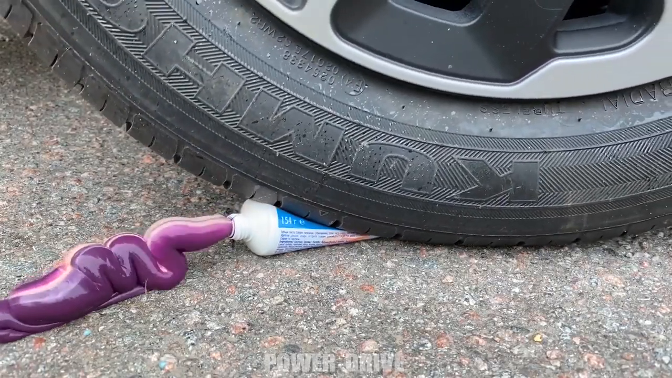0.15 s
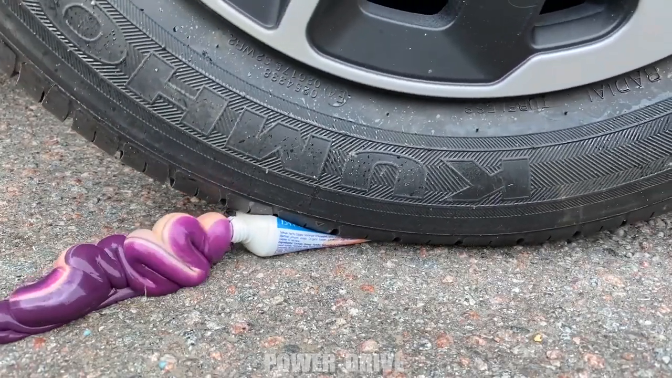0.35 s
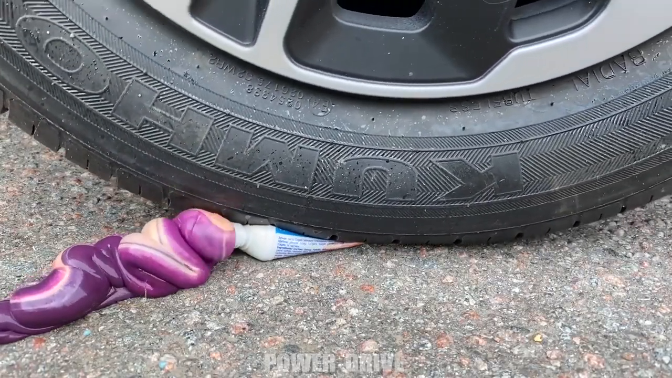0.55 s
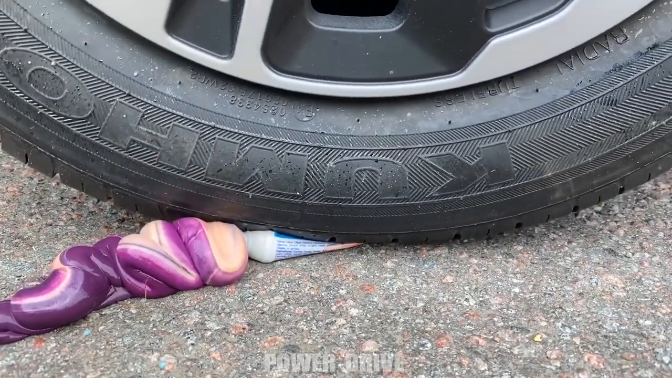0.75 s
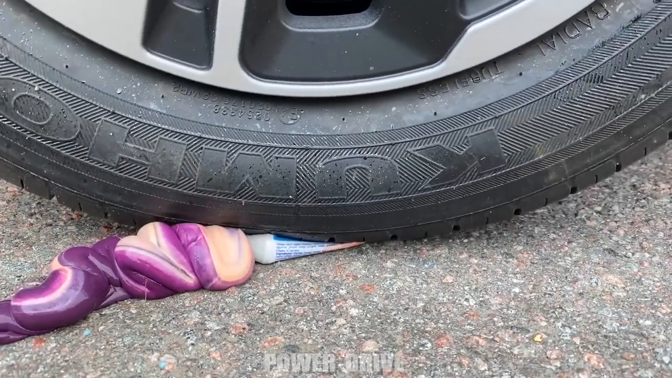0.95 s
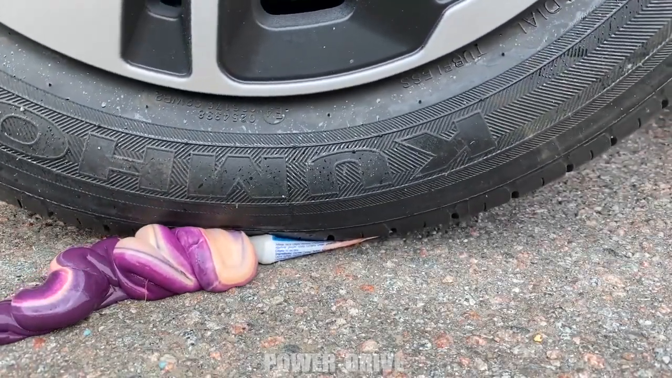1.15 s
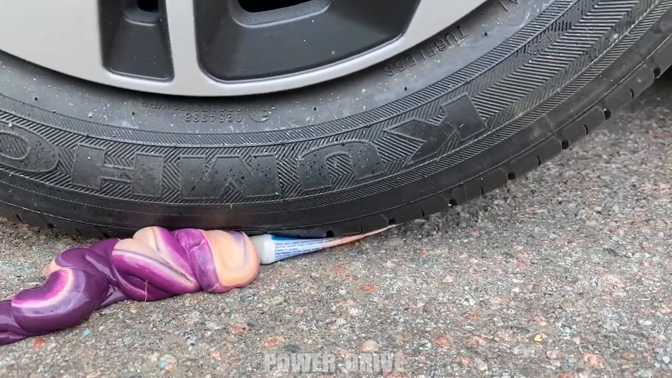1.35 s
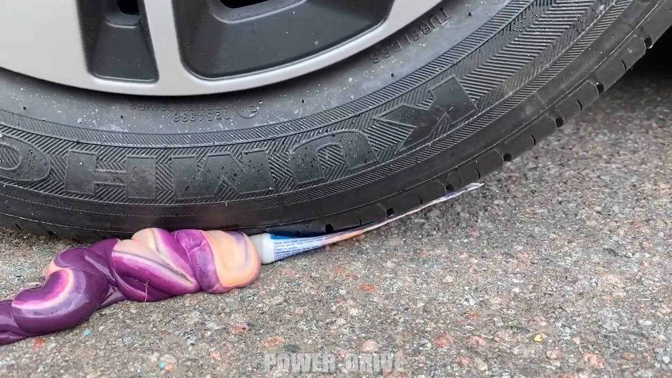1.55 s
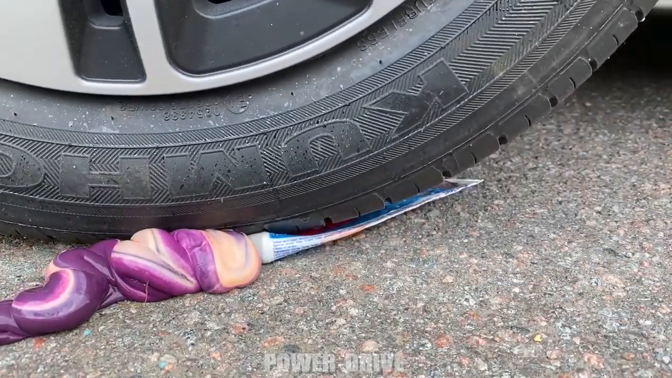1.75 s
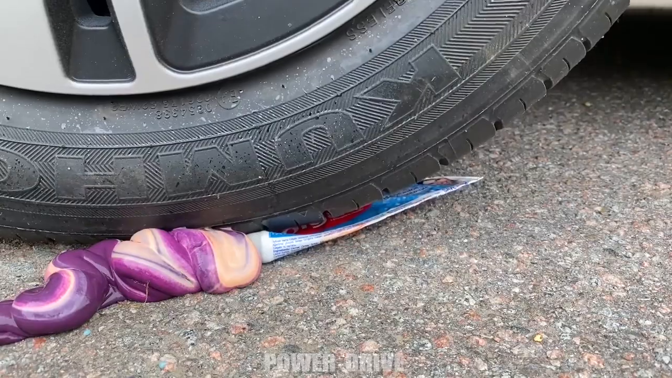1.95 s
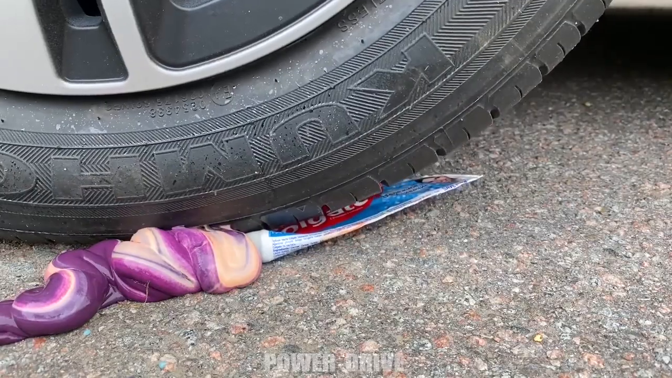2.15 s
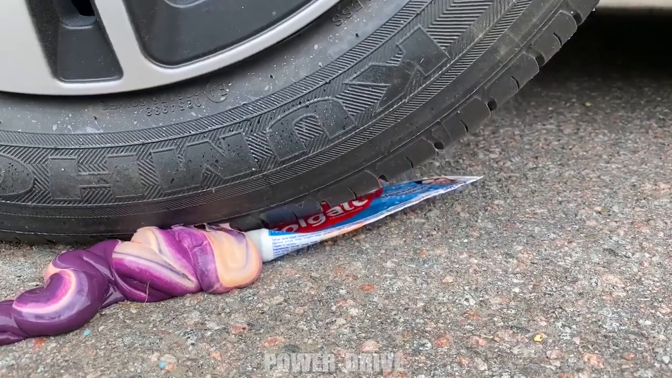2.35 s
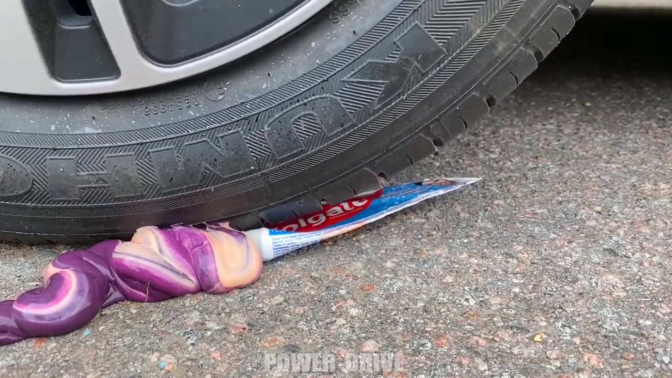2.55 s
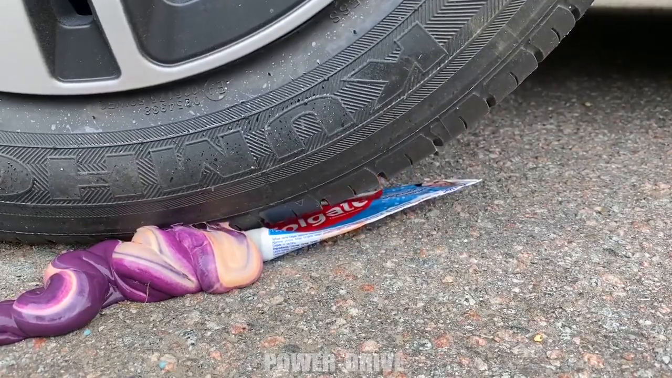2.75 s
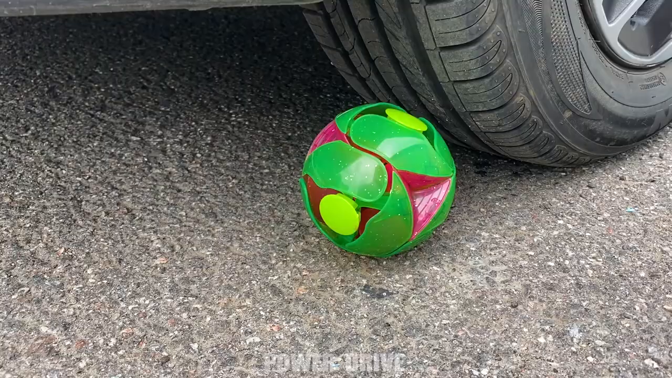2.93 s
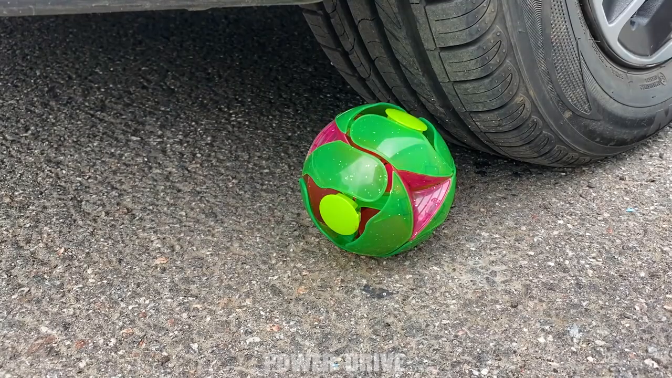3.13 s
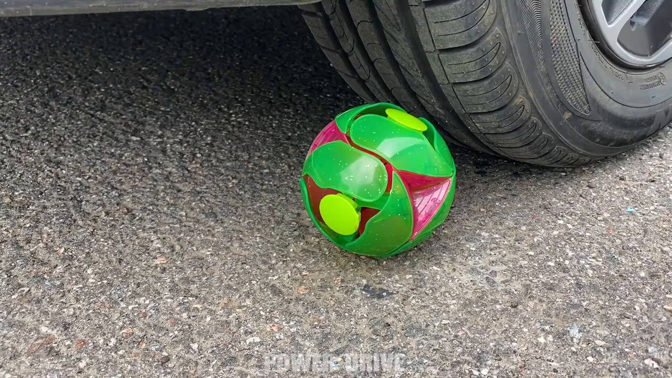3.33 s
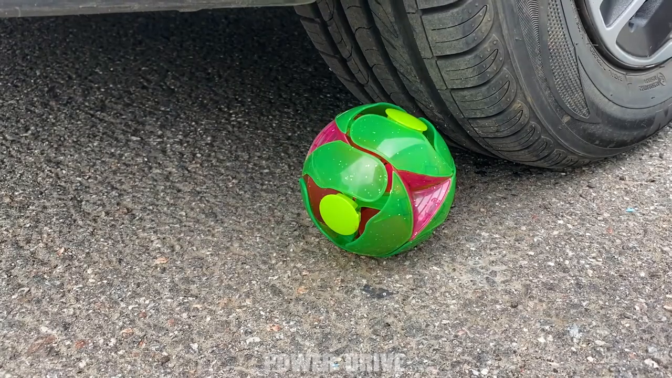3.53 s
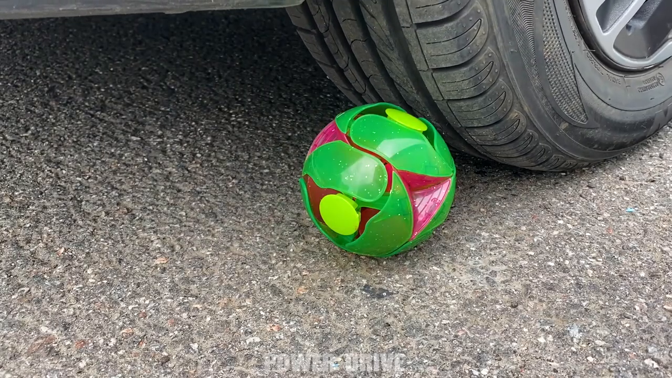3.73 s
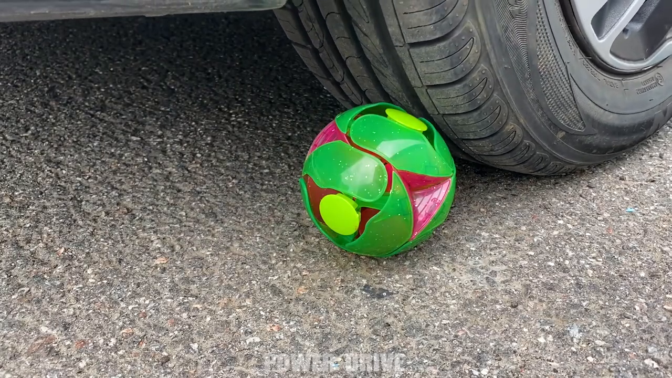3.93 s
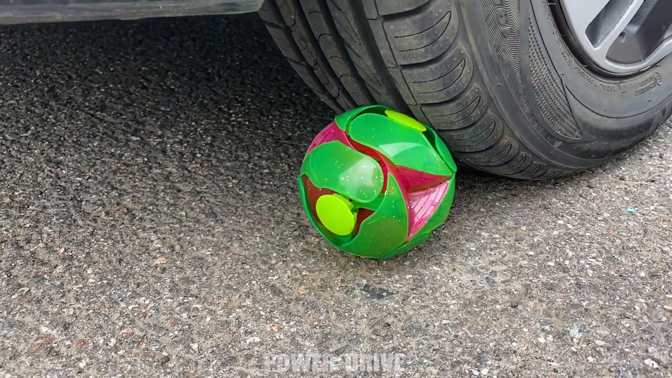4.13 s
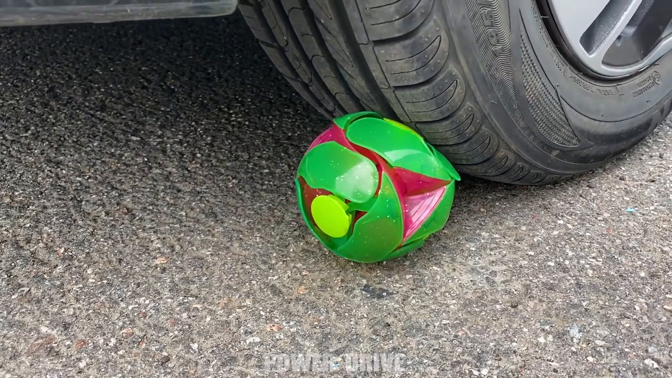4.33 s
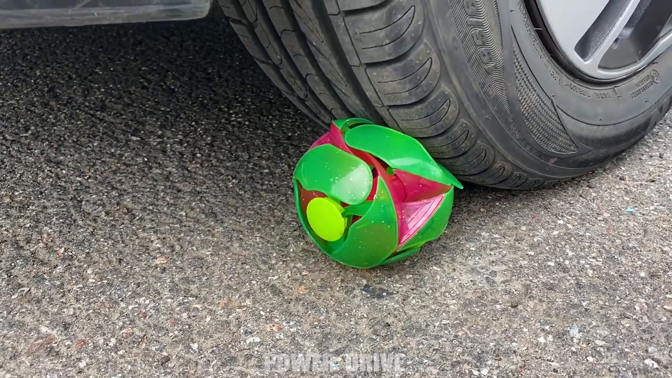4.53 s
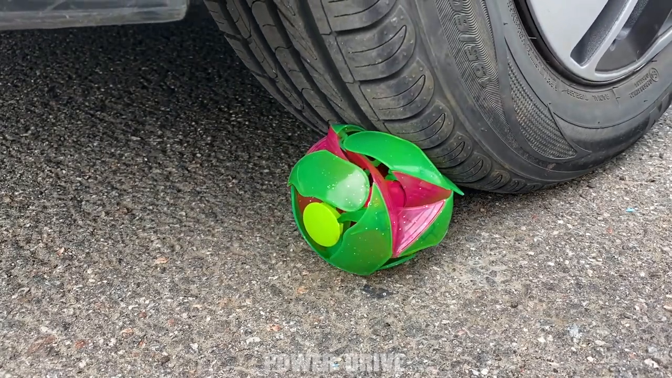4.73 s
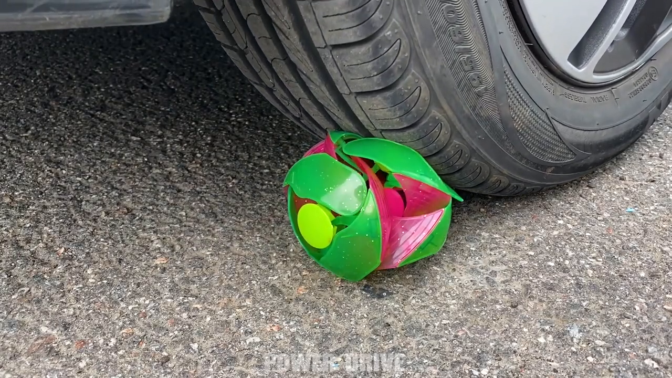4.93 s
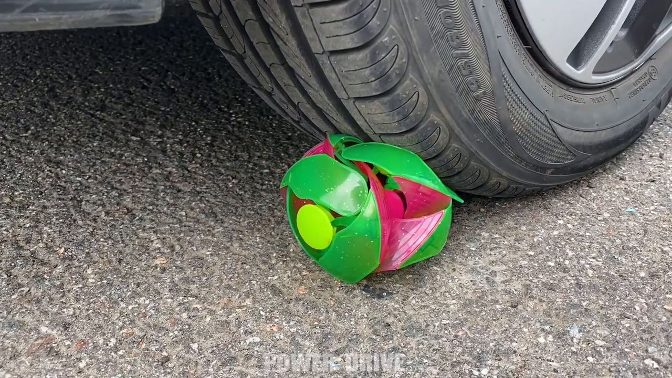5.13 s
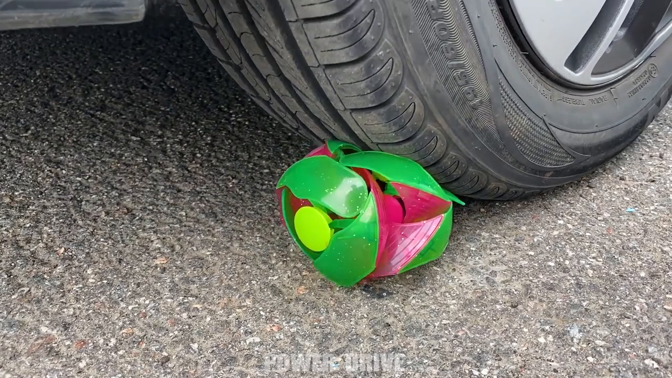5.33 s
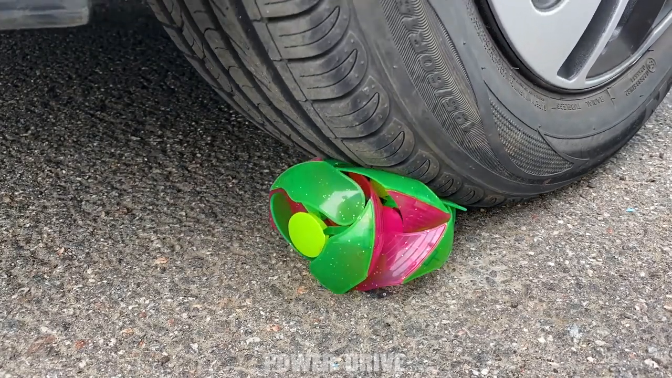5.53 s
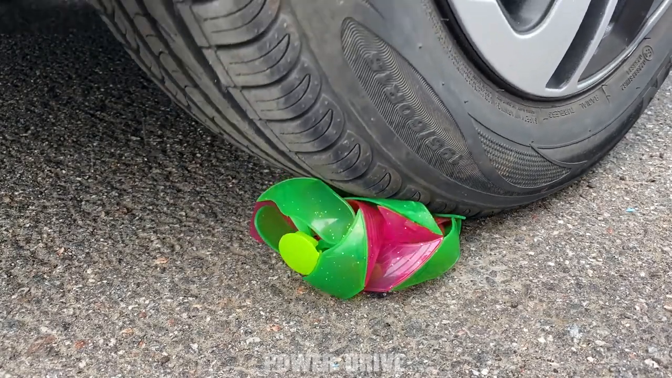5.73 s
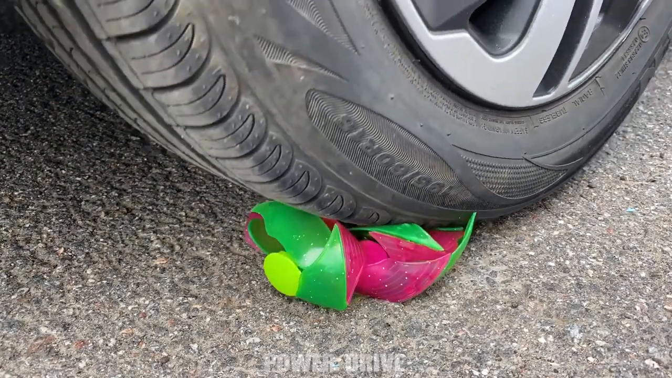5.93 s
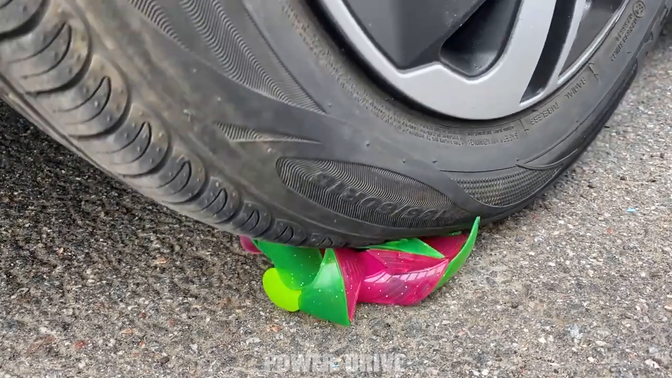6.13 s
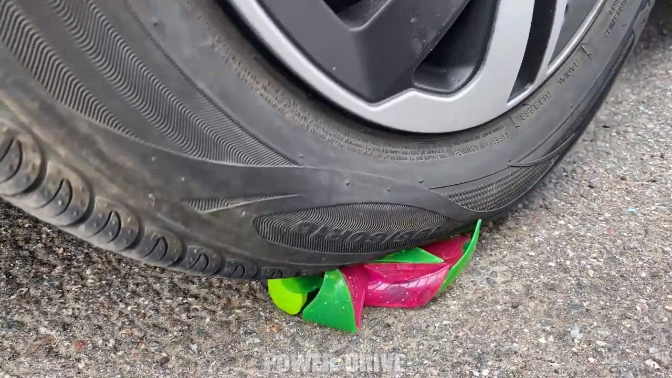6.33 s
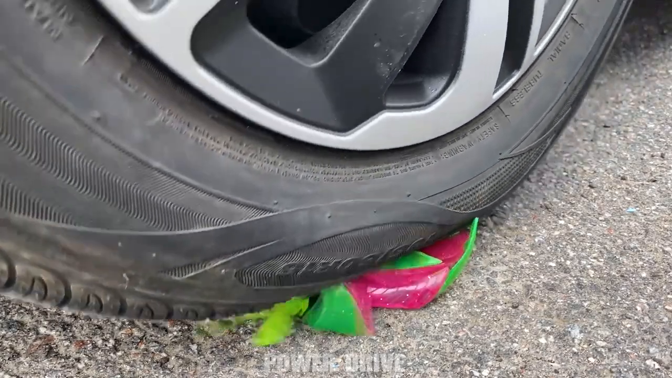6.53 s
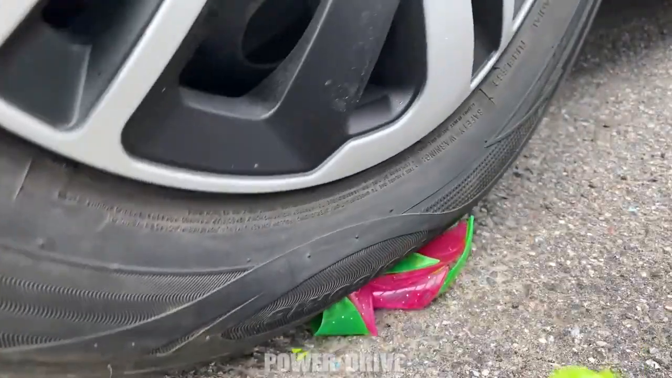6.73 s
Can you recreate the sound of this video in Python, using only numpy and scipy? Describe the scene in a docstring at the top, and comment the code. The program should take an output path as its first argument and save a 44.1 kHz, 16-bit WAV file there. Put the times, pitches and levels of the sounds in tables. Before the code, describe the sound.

Over a low engine hum, a soft tube faintly ticks and squeaks under a tyre, then a plastic toy ball cracks and crunches apart.

```python
"""A car idles close by, exhaust booming over a wash of engine noise, heard through a two-port microphone.
Faint ticks scatter. The tyre squeezes a soft tube, which whines, ticks and squeaks, then drops off it.
From 3 s, at a second spot: rumble, a faint chirp, a stone under the tread. The tyre creeps onto a hollow
plastic ball; the shell tears, snaps and rings, panels buckle and shove air out, splinters fall.
The engine wash dips and swells among the cracks and sinks away."""
import sys
import numpy as np
from scipy import signal
from scipy.fft import rfft, irfft
from scipy.io import wavfile
from scipy.ndimage import uniform_filter1d

SR = 44100
rng = np.random.default_rng(int(sys.argv[2]) if len(sys.argv) > 2 else 0)


def materialize(psi):
    """Save the field psi as 16-bit PCM at rate SR to the path in sys.argv[1].

    A 1-D psi becomes a single channel; in a 2-D psi each row is a channel.
    """
    bounded = np.clip(np.atleast_2d(psi).T, -1, 1)
    quanta = np.round(bounded * 32767).astype(np.int16)
    wavfile.write(sys.argv[1], SR, quanta)


N = 298896
SECOND_SPOT_S = 2.988
PAD = 64  # samples ahead of each tick and crack
SIDES = np.array([[1], [-1]])  # left, right


def gain_of(db):
    """Decibels to gain."""
    return 10 ** (np.asarray(db) / 20)


def unit_rms(x):
    """Scale to rms 1."""
    return x / np.sqrt(np.mean(x ** 2) + 1e-20)


def drift(count, size):
    """Unit-rms noise smoothed over size points."""
    return unit_rms(uniform_filter1d(rng.standard_normal(count), size=size))


def at_hz(points, hz):
    """Interpolate on a log-frequency axis."""
    f, value = np.transpose(points)
    return np.interp(np.log(hz + 1), np.log(f + 1), value)


def add(mix, s, sound):
    """Mix a stereo sound in at s seconds."""
    part = mix[:, round(s * SR):][:, :sound.shape[1]]
    part += sound[:, :part.shape[1]]


def ports(hz, lag_ms):
    """Left port's lag behind the right; treble creeps round the case with one lag for all sources."""
    lag_ms = np.interp(hz, (5000, 8000), [lag_ms, .186])
    return np.exp(-1j * np.pi * hz * lag_ms / 1000 * SIDES)


def wash(spectrum, coherence, balance, lag_ms, patchy_db):
    """Engine noise with drifting spectral patches, partly alike at the two ports."""
    frames, hz = N // 512 + 5, np.fft.rfftfreq(2048, 1 / SR)
    a, b, c, d, patches = rng.standard_normal((frames, 1025, 5)).T
    patches = uniform_filter1d(patches, size=20, axis=0)
    patches = unit_rms(uniform_filter1d(patches, size=5, axis=1))
    like = at_hz(coherence, hz)[:, None]
    left = a + 1j * b
    right = like * left + np.sqrt(1 - like ** 2) * (c + 1j * d)
    pair = ports(hz, lag_ms) * gain_of(at_hz(balance, hz) / 2 * SIDES)
    colour = gain_of(at_hz(spectrum, hz)[:, None] + patchy_db * patches)
    spectra = np.array([left, right]) * pair[:, :, None] * colour
    return signal.istft(spectra, nperseg=2048, noverlap=1536)[1][:, :N]


# Exhaust boom: t/s, f/Hz
IDLE_PITCH = [(0.0, 59.7), (.6, 59.8), (1.7, 60.24), (2.1, 60.1), (2.98, 59.9)]
# Exhaust orders: multiple of the boom, relative level/dB
IDLE_ORDERS = [(0.5, -18), (1, 0), (1.25, -40), (1.5, -17), (1.75, -38), (2, -22), (2.25, -42), (2.5, -30),
               (2.75, -36), (3, -26), (3.25, -31), (3.5, -26), (3.75, -25), (4, -29), (4.25, -39),
               (4.5, -34), (4.75, -31), (5, -39), (5.25, -33), (5.5, -36), (5.75, -36), (6.25, -38),
               (6.5, -35)]
# Wash spectrum: f/Hz, relative density/dB
IDLE_WASH = [(12, -44), (20, -24.5), (43, -22.5), (87, -16.5), (227, -15.5), (366, -19), (550, -19.5),
             (741, -20.5), (1000, -23), (1400, -25.5), (2000, -35), (2950, -36), (3500, -36.5), (4750, -35),
             (5500, -41.5), (7100, -34.5), (8600, -36.5), (11000, -41), (13500, -42.5), (15000, -53.5),
             (16200, -61.5)]
# Port likeness: f/Hz, coherence
IDLE_COHERENCE = [(60, 1), (250, .85), (500, .6), (1200, .8), (2300, .3), (7000, .35), (9000, .75),
                  (10500, .95)]
# Port balance: f/Hz, left-right/dB
IDLE_BALANCE = [(60, 15), (180, -7.5), (550, -1.5), (1650, -1), (4970, -1), (15000, 0.0)]


def idle():
    """First spot: wavering exhaust orders over a wash that puffs at half the boom rate."""
    t = np.arange(N) / SR
    cycles = np.cumsum(np.interp(t, *np.transpose(IDLE_PITCH))) / SR
    exhaust = np.zeros(N)
    for order, db in IDLE_ORDERS:
        waver = drift(N // 256 + 2, size=12)
        level = np.interp(t, np.arange(len(waver)) * 256 / SR, gain_of(db + 0.23 * waver))
        pipe_smear_rad = 3 * (order ** 2 + 2)
        exhaust += level * np.cos(2 * np.pi * order * cycles + pipe_smear_rad)
    puffs = 1 + 0.0885 * np.cos(np.pi * cycles)
    noise = wash(IDLE_WASH, IDLE_COHERENCE, IDLE_BALANCE, lag_ms=0.3652, patchy_db=1.56)
    engine = gain_of(-25) * unit_rms(exhaust) + gain_of(-37) * unit_rms(noise) * puffs
    return engine * (t < SECOND_SPOT_S)


def tick(peak_db, hz, width_hz, decay_ms, pan_db=0):
    """A short puff of noise in one broad resonance."""
    t, f = np.arange(2048) / SR, np.fft.rfftfreq(2048, 1 / SR)
    puff = rng.standard_normal(2048) * np.exp(-t * 1000 / decay_ms) * np.minimum(t / .001, 1)
    resonance = 1 / (1 + 1j * (f / hz - hz / (f + 1)) * hz / width_hz) ** 3
    both = irfft(rfft(puff) * resonance * ports(f, lag_ms=-0.0875))
    return np.roll(both, PAD, axis=1) / abs(both).max() * gain_of(peak_db + pan_db / 2 * SIDES)


def scattered_ticks(mix, span_s, min_db, count):
    """Tiny ticks, random in time, size and pitch."""
    for when, size, pitch in rng.random((count, 3)):
        hz = 1600 * 4. ** pitch
        snap = tick(min_db + 8 * size ** 2, hz, 1.18 * hz, decay_ms=0.74)
        add(mix, span_s[0] + when * np.ptp(span_s), snap)


def tone(path, partials, rough, size=150):
    """Trembling tone along (t/s, f/Hz, level/dB) rows; returns start time and sound."""
    s, hz, db = np.transpose(path)
    t = np.arange(s[0], s[-1], 1 / SR)
    cycles = np.cumsum(np.interp(t, s, hz)) / SR
    tremble = 1 + rough * drift(len(t), size)
    wave = sum(gain_of(level) * np.sin(2 * np.pi * k * cycles) for k, level in partials)
    envelope = gain_of(np.interp(t, s, db)) * signal.windows.tukey(len(t), 400 / len(t))
    wave = np.sqrt(2) * wave * tremble * envelope
    return s[0], np.array([wave, np.roll(wave, -1)])


def slip(start_s, length_s, first_hz, peak_hz, last_hz, rise, db, ends_db):
    """Path of one slip: pitch glides while the level swells, holds and fades."""
    share = np.array([0, rise, rise + 0.305 * (1 - rise), 1])
    hz = np.interp(share, [0, rise, 1], [first_hz, peak_hz, last_hz])
    return np.transpose([start_s + share * length_s, hz, db + ends_db * np.array([1, 0, 0.2, 0.85])])


# Whine: t/s, length/s, nominal first, peak and last f/Hz, rise share, level/dB
WHINE = (.26, .255, 10163, 10164, 10165, .4, -50)


def whine():
    """A thin, steady whine near 10 kHz."""
    return tone(slip(*WHINE, ends_db=-3.5), [(0.999, 0)], rough=0.126)


# Tube ticks: t/s, peak level/dB, centre f/Hz, decay/ms
TUBE_TICKS = [(0.379, -33, 3800, 2.8), (0.4326, -21, 1145, 2.3), (.4345, -23, 780, 3),
              (.441, -37.5, 1400, 5.3), (0.446, -26, 810, 5), (0.45, -36, 1400, 3.3),
              (0.499, -37, 2500, 4.8), (.517, -35, 2350, 2.1), (0.539, -33, 1780, 1.7),
              (0.545, -35, 2820, 3), (.766, -33.5, 2600, 6.3), (.833, -34.5, 2800, 6.4),
              (.907, -37.5, 2620, 4.1), (1.008, -32, 2850, 2.5), (1.09, -35.5, 3040, 6.9),
              (1.166, -34, 2910, 7), (1.48, -31.5, 2600, 5.2), (1.488, -31.5, 2900, 5.5),
              (1.88, -34, 3000, 15.5), (2.105, -34.5, 2600, 3.2), (2.61, -35, 2530, 15.5),
              (2.625, -29.5, 560, 44), (2.639, -32.5, 3030, 13)]


def tube_ticks(mix):
    """The squeezed tube ticks and pops, a little to the left."""
    for s, db, hz, decay_ms in TUBE_TICKS:
        width_hz = 1.056 * hz * np.cbrt(hz / 3000)
        add(mix, s - PAD / SR, tick(db, hz, width_hz, decay_ms, pan_db=2.5))


# Slips: t/s, length/s, first, peak and last f/Hz, rise share, base level/dB
SQUEAKS = [(0.496, 0.071, 3830, 4142, 4205, .45, -55.5), (0.776, 0.0347, 3994, 4054, 4120, 0.635, -46),
           (0.806, 0.043, 4120, 4127, 4220, 0.36, -52.5), (0.953, 0.0334, 4040, 4040, 4050, 0.41, -58.5),
           (1.205, 0.03, 3850, 4060, 4050, 0.41, -58), (1.234, 0.0754, 3862, 3916, 3964, 0.45, -48),
           (1.308, 0.055, 3950, 4100, 4230, 0.44, -52), (1.377, 0.088, 4123, 4160, 4255, .25, -46),
           (1.461, 0.0365, 4198, 4260, 4270, 0.48, -57.5)]
# Partials: multiple, level/dB over base
SQUEAK_PARTIALS = [(1, 6), (2, -8), (3, -9.5)]


def tube_squeaks(mix):
    """The tube sticks and slips on the rubber in short upward glides."""
    for row in SQUEAKS:
        add(mix, *tone(slip(*row, ends_db=-9), SQUEAK_PARTIALS, rough=0.4, size=200))


def knock(db, hz, t60_s, rise_s):
    """One damped mode, alike in both ports."""
    t = np.arange(SR // 4) / SR
    envelope = gain_of(db - 60 * t / t60_s) * np.minimum(t / rise_s, 1)
    return np.ones((2, 1)) * envelope * np.sin(2 * np.pi * hz * t)


def tyre_drop():
    """The tyre drops off the tube with a dull knock."""
    return knock(db=-22.5, hz=91.7, t60_s=0.29, rise_s=0.0093)


# Wash spectrum: f/Hz, relative density/dB
UNDER_WASH = [(12, -42), (20, -23), (58, -4.5), (95, -2.5), (160, -6.5), (200, -13), (410, -19),
              (700, -20.5), (1300, -24), (2000, -34), (3200, -34.5), (3900, -30), (4500, -34.5),
              (5100, -33), (5550, -35.5), (6500, -35.5), (10800, -34), (13000, -41.5), (15000, -49.5),
              (16200, -63)]
# Port likeness: f/Hz, coherence
UNDER_COHERENCE = [(60, .85), (250, .7), (600, .3), (1200, .45), (2300, .3), (7500, .25), (9000, .6),
                   (10500, .95)]
# Port balance: f/Hz, left-right/dB
UNDER_BALANCE = [(60, -0.5), (180, -0.5), (550, 3), (1650, 1), (4970, 3.5), (15000, -2)]
# Wash envelope: t/s, hiss level/dB, rumble over hiss/dB
UNDER_LEVELS = [(2.99, -38.5, 2.5), (4.1, -38.5, 2.5), (4.9, -38, 0), (4.96, -47, 10), (5.02, -48, -0.5),
                (5.08, -40.5, 6.5), (5.42, -36.5, 1), (5.53, -50, -8), (5.62, -45, 5), (5.76, -46, -4.5),
                (5.92, -59, 12.5), (6.05, -45.5, -5), (6.13, -49, 8), (6.2, -57, -0.5), (6.28, -46.5, -4),
                (6.38, -53.5, 12.5), (6.5, -50.5, 3.5), (6.66, -49.5, 7.5), (6.78, -58, 8)]


def under_car():
    """Second spot: engine rumble and hiss, sinking and swelling."""
    t = np.arange(N) / SR
    s, hiss_db, rumble_db = np.transpose(UNDER_LEVELS)
    noise = wash(UNDER_WASH, UNDER_COHERENCE, UNDER_BALANCE, lag_ms=-0.389, patchy_db=.8)
    rumble = signal.sosfiltfilt(signal.butter(2, 224, fs=SR, output="sos"), noise)
    both = unit_rms(rumble) * gain_of(np.interp(t, s, rumble_db)) + unit_rms(noise - rumble)
    return both * gain_of(np.interp(t, s, hiss_db)) * (t >= SECOND_SPOT_S)


# Exhaust boom: t/s, nominal f/Hz, level/dB
BOOM = [(2.99, 59.84, -34.5), (3.33, 56.5, -33), (3.45, 51.77, -53), (3.75, 53.86, -46),
        (4.0, 58.39, -48.5), (4.3, 60.16, -38), (4.8, 60.37, -35), (4.9, 60.5, -61)]


def exhaust_boom():
    """Second spot: the exhaust note sags, recovers and fades."""
    return tone(BOOM, [(0.99, 0.018)], rough=0.3, size=2500)


# Chirp: t/s, f/Hz, base level/dB
CHIRP = [(3.0, 3787, -64), (3.6, 3860, -61), (4.3, 3870, -63.5)]
# Partials: multiple, level/dB over base
CHIRP_PARTIALS = [(1, 0.5), (1.32, -3.5)]


def chirp(rate_hz=10.55, crest_s=3.282):
    """A faint belt-like chirp: two rough, throbbing lines."""
    s, sound = tone(CHIRP, CHIRP_PARTIALS, rough=0.54)
    throb = np.cos(2 * np.pi * rate_hz * (s - crest_s + np.arange(sound.shape[1]) / SR))
    return s, sound * np.maximum(throb, 0) ** 2 * 2


def grit():
    """A stone grinds under the tread."""
    return tick(peak_db=-32.5, hz=3700, width_hz=1500, decay_ms=29)


CRACK_N, LEAD_S, SNAP_MS = 5120, .008, 1.8  # faint hiss starts at t = -LEAD_S; snap at t = SNAP_MS
# Port likeness of the tearing: f/Hz, coherence
TEAR_COHERENCE = [(2800, .95), (4000, .5), (7000, .4), (9500, .9), (11000, 1)]


def tearing(t, hz, noise, tear_ms, lead_in_ms=3.8, click_ms=0.19, push_ms=0.0716):
    """Force spectrum: a faint hiss swells, then the plastic tears and breaks with one short push."""
    u = (t * 1000 - SNAP_MS) / tear_ms
    lead_in = 0.081 * np.exp(t * 1000 / lead_in_ms - 1)
    envelope = np.where(u < 0, np.exp(1.75 * u) + lead_in, np.exp(-1.4 * u))
    click = 1 + 0.61 * np.exp(-abs(u) * tear_ms / click_ms)
    burst = noise * envelope * click
    strength = np.sqrt(tear_ms * SR / 1000)
    left, other = rfft(burst / np.linalg.norm(burst, axis=1, keepdims=True) * strength)
    like = at_hz(TEAR_COHERENCE, hz)
    right = like * left + np.sqrt(1 - like ** 2) * other
    push = np.exp(-(np.pi * hz * push_ms / 1000) ** 2 - 2j * np.pi * hz * (LEAD_S + SNAP_MS / 1000))
    return np.array([left, right]) + 0.72 * strength * rng.choice([-1, 1]) * push


def resonance(hz, centre_hz, width_hz, db):
    """Response of one damped mode."""
    return gain_of(db) / (1 + 2j * (hz - centre_hz) / width_hz)


# Shell modes: f/Hz, width/Hz, level/dB
SHELL_MODES = [(2112, 1830, -1), (3067, 701, 9), (4617, 993, 7.5), (6490, 298, 11.5), (6720, 1090, 7),
               (10080, 2170, 5.5), (11690, 2560, 3), (15010, 1000, 3.5)]


def shell_response(hz, snap_db, tilt_db, body_db):
    """Broad modes of the plastic shell, shifted and coloured anew by each crack."""
    shifts_hz = 200 * rng.uniform(-1.3, 1, len(SHELL_MODES))
    modes = sum(resonance(hz, f + shifts_hz[k], width, db) * (-1) ** k
                for k, (f, width, db) in enumerate(SHELL_MODES))
    top_db = snap_db + tilt_db / 2
    colour_db = np.interp(np.log(hz + 1), np.log([2155, 3493, 6040, 12350, 16500]),
                          [body_db, snap_db - tilt_db / 2, snap_db, top_db, top_db - 14])
    return modes * gain_of(colour_db + 12)


def panel_ring(age_s, db, hz, cycles):
    """A freed panel rings, losing 60 dB over the given cycles."""
    envelope = gain_of(db + 13 - 60 * age_s * hz / cycles) * np.minimum(age_s / 0.00073, 1)
    return envelope * np.sin(2 * np.pi * hz * age_s)


def air_thump(age_s, db, hz, t60_s=0.017):
    """Squashed air thumps, its pitch falling from 3 to 0.4 times hz."""
    cycles = hz * (0.4084 * age_s + 0.009311 * (1 - np.exp(-age_s / 0.00356)))
    envelope = gain_of(db + 12.5 - 60 * age_s / t60_s) * np.minimum(age_s / 0.0022, 1) ** 2
    return envelope * np.sin(2 * np.pi * cycles)


# Scatter decay: f/Hz, t60/s
SCATTER_T60 = [(300, 0.0398), (850, 0.1002), (1500, 0.0332), (4000, 0.0738), (12000, 0.0286)]


def scatter(age_s, noise, db):
    """Spectrum of the scatter off tyre, sill and road, lumpy with after-cracks."""
    f, frame_s, spectra = signal.stft(noise, SR, nperseg=128)
    decay = gain_of(db - 60 * np.maximum(frame_s - LEAD_S, 0) / at_hz(SCATTER_T60, f)[:, None])
    tail = signal.istft(spectra * decay, SR, nperseg=128)[1][:, :CRACK_N]
    lumps = unit_rms(gain_of(4 * drift(CRACK_N, size=60)))
    return rfft(tail * lumps * np.minimum(age_s / 0.0029, 1))


def crack(snap_db, tilt_db, body_db, tear_ms, ring_db, ring_hz, cycles, thump_db, thump_hz, scatter_db):
    """Tearing drives the shell to a snap; ring, thump and scatter follow."""
    t, hz = np.arange(CRACK_N) / SR - LEAD_S, np.fft.rfftfreq(CRACK_N, 1 / SR)
    age_s = np.maximum(t - (SNAP_MS - 0.3468 * tear_ms) / 1000, 0)
    noise = rng.standard_normal((4, CRACK_N))
    shell = shell_response(hz, snap_db, tilt_db, body_db)
    snap = tearing(t, hz, noise[:2], tear_ms) * shell
    ring = panel_ring(age_s, ring_db, ring_hz, cycles)
    thump = air_thump(age_s, thump_db, thump_hz)
    direct = (snap + rfft(ring + thump)) * ports(hz, lag_ms=-0.0824)
    panel = resonance(hz, ring_hz, 300 + 0.16 * ring_hz, ring_db + 15.5)
    cavity = resonance(hz, thump_hz, 250, thump_db + 26.5)
    tail = scatter(age_s, noise[2:], scatter_db) * (shell + panel + cavity)
    bass_cut = hz ** 2 / (hz ** 2 + 60. ** 2)  # a small ball radiates no deep bass
    return np.roll(irfft((direct + tail) * bass_cut), PAD, axis=1)


# Cracks, levels relative: t/s, snap level/dB, treble tilt/dB, body level/dB, tear/ms, ring level/dB,
# ring f/Hz, ring t60/cycles, thump level/dB, nominal thump f/Hz, scatter level/dB
CRACKS = [(4.3274, -34.5, 7.5, -26, 1.44, -25, 3151, 23, -56.5, 197.8, -5.5),
          (4.3313, -39, -26, -22.5, 0.94, -36, 3600, 4, -29.5, 146, -16.5),
          (4.337, -57, -14.5, -28, 1.9, -37, 4900, 20.5, -61, 150, -13),
          (4.4015, -31, -11, -20, 0.99, -22.5, 2850, 11, -59.5, 460, -10),
          (4.4028, -52.5, -15.5, -41, 0.93, -19, 4380, 23.5, -60.5, 300, -11.5),
          (4.4114, -60, -15, -51.5, 1.24, -27, 4440, 27, -56.5, 176, -14.5),
          (4.4963, -46.5, -16, -43.5, 1.3, -27, 2922, 13, -59.5, 141.3, -11),
          (4.5334, -19.5, 3, -30, 1.206, -12.5, 1650, 3.5, -32, 139.5, -10),
          (4.6992, -42.5, 26, -45, 2.5, -46, 709, 9, -38.5, 111.6, -10),
          (4.8255, -26.5, 23.5, -51, 1.8, -52.5, 596, 11, -58.5, 240, -11.5),
          (4.871, -30.5, 6.5, -31, 1.97, -30.5, 1916, 4.5, -33.5, 128.9, -6),
          (4.928, -23.5, 7.5, -28.5, 2.22, -20, 1450, 3, -37, 142, -5.5),
          (5.143, -43, 6, -38.5, 1.6, -37, 890, 8, -46, 135, -1.5),
          (5.172, -46, -10.5, -34.5, 2.16, -43.5, 619, 7.5, -42.5, 137, -1.5),
          (5.22, -19, -1.5, -21.5, 1.18, -21, 2310, 0.5, -38.5, 116, -10),
          (5.2277, -45, -7, -48, 1.76, -55, 899, 6, -39, 110, -4.5),
          (5.4604, -25.5, 9.5, -21, 1.29, -19, 2006, 18, -29.5, 107, -5.5),
          (5.4848, -27, -11, -11.5, 1.294, -15, 2174, 16.5, -37.5, 220, -12.5),
          (5.4903, -47.5, -8.5, -27.5, 2.14, -25, 2300, 14, -46.5, 214, -8.5),
          (5.525, -53, 3, -52.5, 2.5, -48.5, 2370, 9.5, -61, 167, -2),
          (5.545, -55.5, 14.5, -44.5, 2.6, -35, 2550, 7.5, -65.5, 167, -10.5),
          (5.572, -43.5, -9.5, -29.5, 0.58, -27, 2590, 9.5, -59.5, 436, -12.5),
          (5.5765, -60, 0, -48.5, 1.86, -36, 800, 5.5, -41.5, 438, -11.5),
          (5.588, -53, 3.5, -59.5, 2.85, -60, 1500, 9, -59, 300, -9),
          (5.603, -38.5, 0.5, -41, 1.83, -47.5, 695, 6, -52.5, 116, -5.5),
          (5.6066, -36, 3, -29, 0.99, -29, 1610, 10, -48.5, 106, -6),
          (5.6143, -23, 10.5, -17, 2.15, -20, 1462, 17, -24.5, 347.6, -4.5),
          (5.6308, -33.5, 10, -47, 2, -52, 1400, 9.5, -42, 130, -10.5),
          (5.693, -35, 0, -41, 1.3, -35, 1080, 8, -50, 110, -8),
          (5.7083, -55, -23.5, -32, 1.07, -28, 2560, 12, -57, 148, -8.5),
          (5.718, -38, 0, -27.5, 2.57, -35.5, 554, 9.5, -47, 443, 0),
          (5.731, -30, 9, -38.5, 2.7, -28.5, 865, 6.5, -48, 458, -5.5),
          (5.7461, -23.5, 16.5, -16, 0.66, -18, 3450, 15, -54.5, 110, -12),
          (5.767, -47.5, -6, -24, 0.74, -29, 2400, 10.5, -42.5, 446, -16.5),
          (5.7831, -33.5, 2, -22.5, 1.11, -36, 2200, 9, -51.5, 390, -8),
          (5.7852, -26, 10, -17.5, 1.14, -19, 3100, 17.5, -40, 382, -8.5),
          (5.7954, -28.5, -2, -16.5, 0.98, -33, 1003, 10.5, -35.5, 278, -13),
          (5.8152, -31.5, 3, -19, 0.89, -22, 1487, 27, -37, 254, -8),
          (5.8419, -35.5, 2, -26.5, 3.07, -29.5, 797, 11.5, -53.5, 318, -3),
          (5.8793, -23.5, 12, -20.5, 2.22, -18, 1756, 10, -29, 331.2, -2.5),
          (5.9027, -36, 10, -49, 1.6, -36.5, 1280, 8.5, -35.5, 190, -14.5),
          (5.918, -64, -2.5, -53.5, 2.3, -49, 703, 12.5, -47.5, 129, -6),
          (5.9316, -31.5, 4.5, -28.5, 1.65, -31, 1480, 5, -38.5, 239, -8),
           (5.9949, -54.5, 4.5, -43.5, 2.1, -58.5, 695, 8.5, -70, 183, -11.5),
          (6.0266, -30, 11.5, -20, 1.63, -32.5, 720, 13.5, -34.5, 445.5, -8.5),
          (6.0841, -32.5, 2.5, -18.5, 1.05, -18.5, 1832, 7, -38.5, 138, -9),
          (6.112, -25.5, 10, -19.5, 1.555, -9, 3085, 15, -16, 376.6, -12.5),
          (6.165, -47, -11.5, -40.5, 1.17, -32.5, 1260, 4.5, -42.5, 221, -8),
          (6.244, -45, 8.5, -35.5, 1.75, -42, 1043, 9, -44.5, 126, -13),
          (6.2527, -39, 28.5, -49, 0.79, -45, 1046, 9, -42, 313, -12.5),
          (6.2862, -36.5, 10, -23.5, 1.48, -29, 790, 8.5, -38, 346, -9),
          (6.326, -55, 4, -54.5, 2.3, -53.5, 775, 8, -39.5, 127, -6),
          (6.3365, -59, -0.5, -54.5, 1.5, -37.5, 760, 6.5, -60.5, 200, -12),
          (6.3414, -32.5, 10.5, -32, 2.65, -34, 2270, 8.5, -34, 115.5, -7.5),
          (6.3473, -23, 13, -17.5, 1.34, -10, 762, 9, -20, 220.5, -9),
          (6.3735, -55, -5.5, -52, 1.7, -38.5, 735, 13.5, -62, 110, -7.5),
          (6.389, -25, 5.5, -30.5, 0.85, -29.5, 1180, 6.5, -21, 478, -8),
          (6.428, -56, 10, -55, 1.73, -56.5, 1200, 6.5, -65, 200, -7),
          (6.454, -44, 3, -44, 2.06, -36, 774, 5.5, -59, 236, -2),
          (6.463, -47.5, 0, -40, 2.73, -37, 880, 6, -56, 234, -8),
          (6.6017, -39.5, 11, -42.5, 3.75, -28.5, 965, 7, -45, 320, 0),
          (6.606, -22, 10, -21.5, 1.7, -22, 580, 11.5, -21.5, 427, -7.5),
          (6.6099, -45, 8, -21, 2.29, -14.5, 930, 11.5, -15.5, 325.7, -8.5),
          (6.671, -58, 7.5, -47.5, 1.2, -43, 1540, 9, -70, 110, -11.5),
          (6.6885, -33, 11.5, -36, 1.2, -26, 3100, 13.5, -56.5, 115, -14.5),
          (6.6902, -28, 10.5, -31, 1.603, -18.5, 3820, 33.5, -45, 115, -28),
          (6.7454, -27, 16.5, -27, 0.76, -29, 770, 6, -62, 239, -10)]
# Ball position: t/s, left-right/dB
BALL_PAN = [(4.3, 0), (6.78, 1.5)]


def ball_cracks(mix):
    """The ball cracks again and again as the tyre pushes it leftwards."""
    for s, *row in CRACKS:
        pan_db = np.interp(s, *np.transpose(BALL_PAN))
        add(mix, s - LEAD_S - PAD / SR, crack(*row) * gain_of(pan_db / 2 * SIDES))


# Buckles: t/s, level/dB, f/Hz, t60/s, lower and upper hollow mode level/dB
BUCKLES = [(5.6185, -14.5, 204.5, 0.036, -50.5, -49), (5.622, -20.5, 104.3, 0.078, -50, -49.5),
           (5.8835, -15, 230.2, 0.0392, -48, -38.5), (6.117, -22.5, 90, 0.024, -42, -39),
           (6.35, -24.5, 101.4, 0.047, -24, -32), (6.613, -18, 100.4, 0.038, -29.5, -27),
           (6.64, -29, 60, 0.078, -49.5, -49)]
# Hollow of the flattened ball: f/Hz, t60/s
HOLLOW_MODES = [(700, 0.084), (990, 0.099)]


def ball_buckles(mix, rise_s=0.00368):
    """Whole panels buckle inwards and shove air out; the hollow rings on."""
    for s, db, hz, t60_s, *modes_db in BUCKLES:
        hollow = sum(knock(level, *mode, rise_s) for level, mode in zip(modes_db, HOLLOW_MODES))
        add(mix, s, knock(db, hz, t60_s, rise_s) + hollow)


def scene():
    """Engine at two spots, with the tube at the first and the ball at the second."""
    mix = idle() + under_car()
    add(mix, *exhaust_boom())
    tube_squeaks(mix)
    add(mix, *whine())
    add(mix, *chirp())
    add(mix, 2.645, tyre_drop())
    add(mix, 3.73, grit())
    tube_ticks(mix)
    ball_cracks(mix)
    ball_buckles(mix)
    scattered_ticks(mix, span_s=(5.69, 5.94), min_db=-36, count=90)  # splinters as the shell caves in
    scattered_ticks(mix, span_s=(5.5, 6.7), min_db=-45, count=20)  # splinters as it is flattened
    scattered_ticks(mix, span_s=(0.084, 3.6), min_db=-49, count=40)  # faint, on into the second spot
    return mix


def record(dry):
    """Soft overload on the loudest snaps, then a 16.9 kHz low-pass."""
    soft = np.tanh(dry ** 3 / 3 + dry) * .96
    lowpass = signal.firwin(511, 16900, window=("kaiser", 9), fs=SR)
    return signal.oaconvolve(soft, lowpass[None], "same")


dry = scene()
out = record(dry)
materialize(out)
```